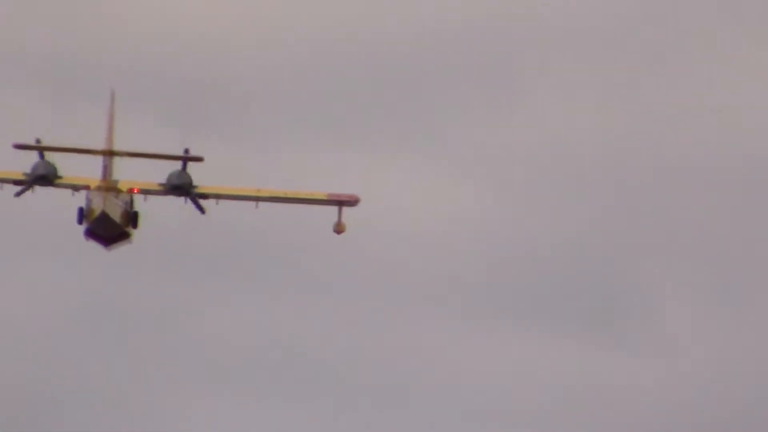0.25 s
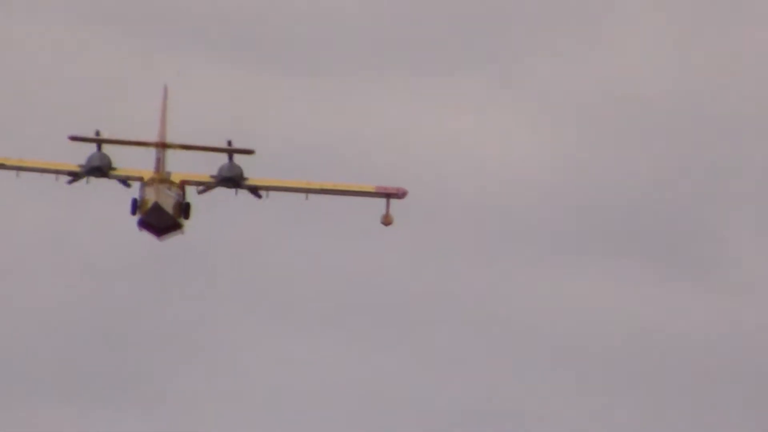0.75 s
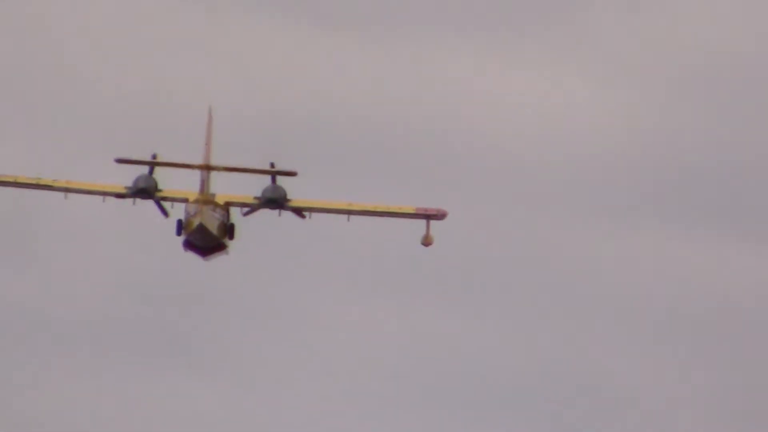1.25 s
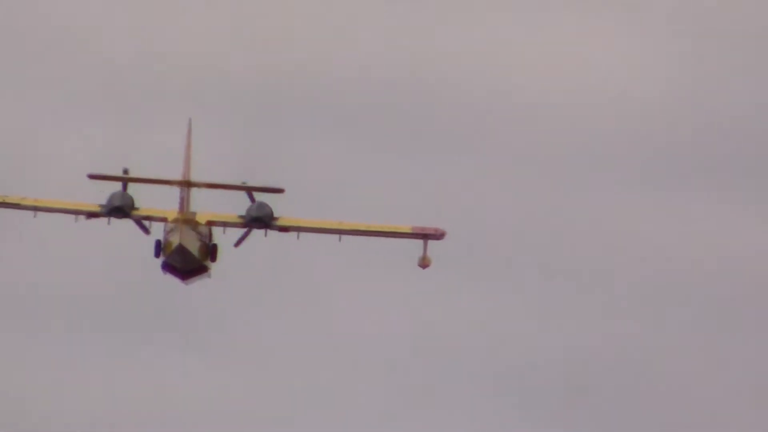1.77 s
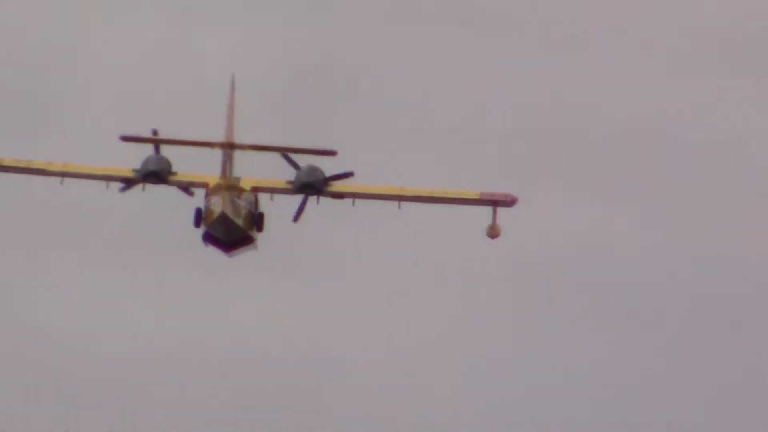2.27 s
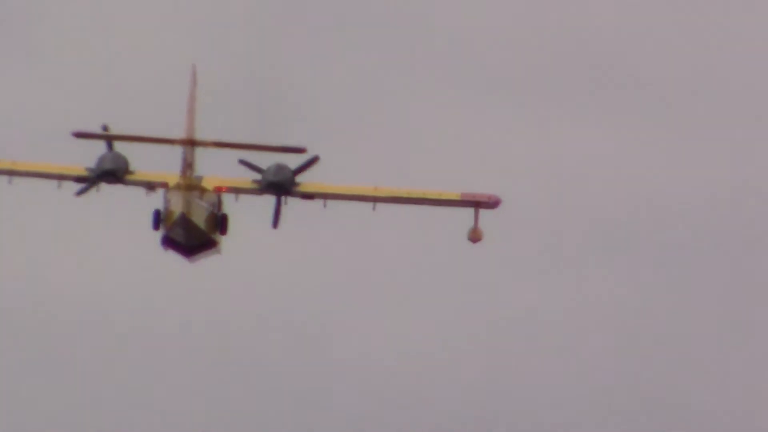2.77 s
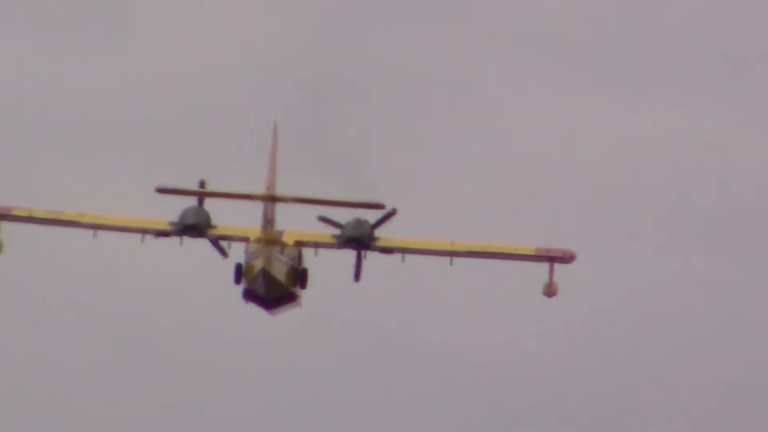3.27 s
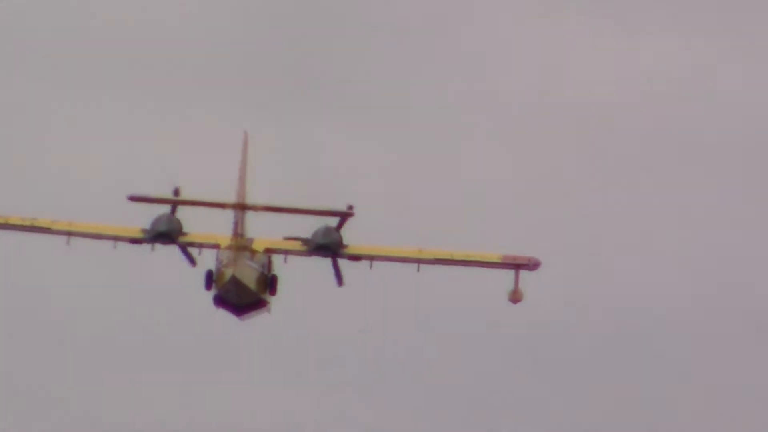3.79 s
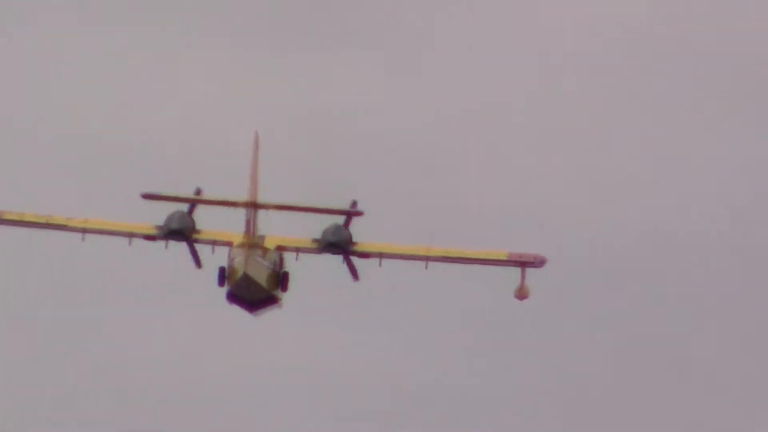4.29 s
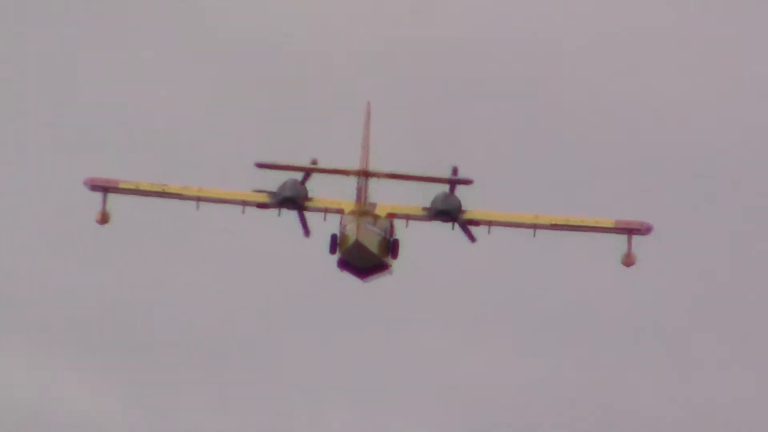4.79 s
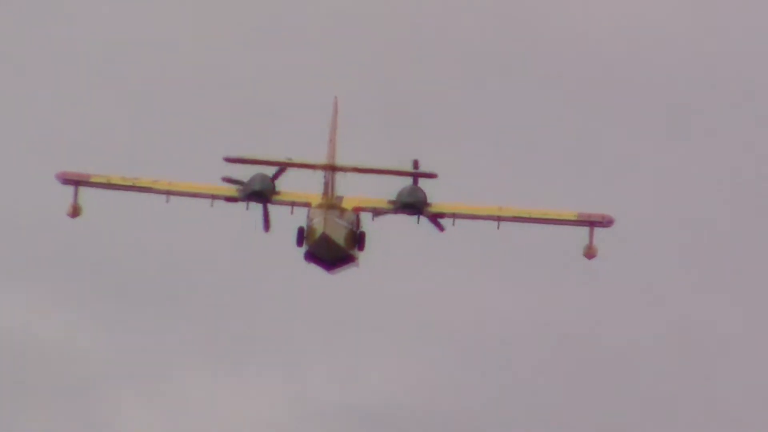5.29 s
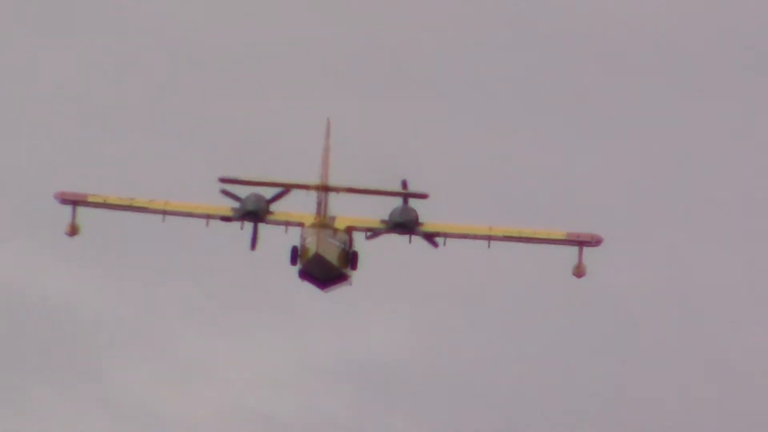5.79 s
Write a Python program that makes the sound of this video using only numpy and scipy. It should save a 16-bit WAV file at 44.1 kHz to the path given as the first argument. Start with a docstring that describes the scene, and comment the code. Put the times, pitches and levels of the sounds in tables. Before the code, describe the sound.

Outdoors, a twin-engine propeller aircraft drones steadily in the distance while loud low wind buffeting rumbles and moans across a handheld camera's stereo microphones. Small plastic clicks sound early. Around two seconds the wind falls to a lull, baring the drone; another click follows, then gusts and slaps return, leaning left and ending strong.

```python
"""From the start a twin-engine aircraft drones far overhead: sine waves at multiples of each engine's
cycle, over a broad roar of noise. Gusts of noise buffet the two microphone ports of a hand-held camera,
with low moans whose pitch glides up and down, a deep rumble and steady hiss. Soon its motor whines in
short bursts, then a cluster of case clicks rings damped modes. The wind drops to a lull after two
seconds, one more click follows, and later gusts and slaps build to a strong finish."""
import sys
import numpy as np
from scipy import signal
from scipy.fft import rfft, irfft
from scipy.io import wavfile
from scipy.ndimage import uniform_filter1d

SR = 44100
rng = np.random.default_rng(int(sys.argv[2]) if len(sys.argv) > 2 else 0)


def dump_mix(stems):
    """Bounce the given channels to the path in sys.argv[1] as a 16-bit WAV at rate SR."""
    frames = np.atleast_2d(stems).T  # one column per channel
    limited = np.clip(frames, -1, 1)  # hard clip at full scale
    pcm = np.round(limited * 32767).astype(np.int16)
    wavfile.write(sys.argv[1], SR, pcm)


N = 266800

# Engine cycles per second, one cycle being two crank turns: start_s, left_engine_hz, right_engine_hz
ENGINE_CYCLES = [(0, 16.74, 16.68), (3, 16.68, 16.64), (6.05, 16.7, 16.62)]
# Tones of both engines: multiple_of_cycle_rate, then peak_db at four even moments, before shimmer
ENGINE_TONES = [(18, -50.5, -50.5, -48, -47), (19, -52, -48, -45, -43), (22, -49, -47.5, -48, -46),
                (25, -55, -51, -44.5, -43), (27, -49, -48, -52, -46.5), (28, -48, -51.5, -41, -44.5),
                (29, -56.5, -54, -49, -44), (30, -40.5, -49.5, -46, -51), (31, -46, -41, -50, -47),
                (33, -45.5, -47, -58, -60), (36, -46.5, -50.5, -60, -60), (37, -49.5, -45.5, -52.5, -57)]

# Changes in the roar; only the change from each column's mean counts:
# start_s, low_hump_db, valley_db, high_hump_db, upper_edge_db
ROAR_CHANGES = [(.3, -0.5, -44, -48, -51.5), (.8, -2.5, -46, -40.5, -52.5), (1.23, 2.5, -47.5, -45, -52),
                (2.1, -4, -50.5, -46, -54.5), (2.45, -0.5, -45, -48, -54), (3.0, -4.5, -45, -48.5, -51.5),
                (3.55, -4.5, -38.5, -52.5, -53.5), (4.0, -4, -46, -48.5, -56),
                (4.6, -4, -46.5, -49.5, -53.5), (5.1, -3.5, -45.5, -44, -53), (5.73, -5, -46.5, -49.5, -55),
                (6.0, -4.5, -46.5, -50.5, -57)]
# Centres of the steady bass and of the four changing regions above it: pitch_hz
ROAR_CENTRES_HZ = (250, 597, 935, 1320, 1900)
# Relative spectrum of the roar: pitch_hz, level_db (per Hz)
ROAR_SPECTRUM = [(25, -35.5), (45, -18), (80, 0.5), (120, 3), (200, -9), (340, -21), (520, -3), (750, -7),
                 (1020, -14.5), (1380, -13.5), (1800, -20), (2300, -33.5), (3000, -41.5)]
ROAR_DB = -33

# Wind at the ports, before slaps and PORT_DB: start_s, level_db, left_minus_right_db
GUSTS = [(0, -17.5, 0), (.45, -16, 0.5), (1.08, -18.5, 2.5), (1.18, -21, 0.5), (1.4, -19, 3),
         (1.94, -23, 2.5), (2.02, -32, -1.5), (2.14, -33, -2), (2.36, -22, 6), (2.48, -22, 1),
         (2.56, -29.5, 3), (2.73, -34.5, -2), (3.03, -30, 3), (3.2, -34.5, 1), (3.3, -28, 3),
         (3.57, -21.5, 7), (4.28, -21.5, 3), (4.42, -27, 1.5), (4.74, -32, 1.5), (4.88, -19.5, 3.5),
         (5.4, -23, 3.5), (5.8, -27, 3.5), (5.93, -21, 8), (6.05, -16.5, 10.5)]
# Hardest slaps, added to the gusts: peak_s, rise_db, left_minus_right_db
WIND_SLAPS = [(1.123, 3.5, 0), (1.27, 3, 2), (1.37, 4.5, 0), (3.279, 2.5, -2), (3.84, 2.5, -4),
              (4.95, 5.5, 2), (5.219, 6, -4), (5.322, 4.5, 6.5), (5.48, 4.5, -3), (5.63, 3.5, -8)]
# Relative spectrum of the buffeting: pitch_hz, level_db (per Hz)
EDDY_SPECTRUM = [(25, -56), (50, -51), (90, -20), (130, -7), (180, -6.5), (245, -6), (380, -14),
                 (600, -33.5), (1200, -53.5), (1700, -66)]
# Hum of the commonest eddy size and its moan: start_s, pitch_hz, left_moan_db, right_moan_db
EDDY_HUM = [(0, 174.5, -42, -45), (.33, 219, -28, -25), (.45, 159.8, -32, -23), (.7, 165.3, -32, -25),
            (.82, 184.7, -30.5, -33), (.95, 192, -17.5, -19), (1.04, 184, -23.5, -14.5),
            (1.16, 195.1, -35, -31.5), (1.25, 194.7, -15.5, -24.5), (1.37, 185, -21, -16),
            (1.5, 170, -14, -18), (1.62, 155, -21.5, -33), (1.72, 185.2, -22, -15), (1.82, 150, -24, -36),
            (1.96, 121.8, -23, -33), (2.05, 130, -45, -54), (2.43, 140.3, -28, -38),
            (2.55, 141.7, -47, -49), (3.8, 194, -37, -38.5), (4.15, 160, -37, -29), (4.7, 139.4, -49, -52),
            (4.95, 202, -27, -28), (5.37, 148.3, -17, -30), (5.47, 149, -39.5, -33), (6.05, 186, -32, -36)]
SLAP_S = 0.044  # half the length of a slap
EDDY_EDGE_HZ, EDDY_WANDER_OCT = 180, 0.054
EDDY_SHARED, EDDY_LAG_S = 0.35, 0.00067  # share by power; it passes the left port first
PORT_DB = 2.5  # one port alone, over the average of the two, where unshared eddies partly cancel

# Deep rumble under the buffeting: start_s, level_db
RUMBLE_LEVELS = [(0, -51), (.5, -44), (.9, -62), (1.4, -54), (2.1, -62), (2.75, -49), (3.1, -40),
                 (3.5, -36), (4.1, -36), (4.6, -54), (5.1, -41), (5.7, -41), (6.05, -33)]
# Relative spectrum of the rumble: pitch_hz, level_db (per Hz)
RUMBLE_SPECTRUM = [(25, -24.5), (45, -14.5), (75, -3), (105, 3), (150, -20)]
RUMBLE_SHARED = 0.5  # share by power

# Relative spectrum of the hiss common to both ports: pitch_hz, level_db (per Hz)
HISS_SPECTRUM = [(1500, 5.5), (2500, 0), (4000, -4), (6000, -6), (9000, -11), (13000, -16), (16000, -20)]
# Relative spectrum of the hiss opposite at the two ports: pitch_hz, level_db (per Hz)
HISS_SIDE_SPECTRUM = [(1200, -9.5), (2000, -6), (2600, -6), (4000, -13), (9000, -22), (13000, -24),
                      (16000, -30)]
HISS_DB, HISS_SIDE_DB = -58, -8  # the side level is relative to HISS_DB

# Bursts of the camera motor, before flutter: start_s, length_s, level_db
MOTOR_BURSTS = [(.12, .05, -68.5), (.38, 0.037, -66), (.455, 0.06, -69), (0.619, 0.042, -68),
                (1.28, 0.26, -71.5), (1.56, .55, -74.5), (2.11, 0.6, -75.5), (2.764, 0.2, -69.5),
                (3.405, 0.043, -70), (3.819, 0.12, -76), (4.01, 0.076, -72), (4.154, .054, -73),
                (4.5, .07, -74), (4.655, 0.22, -74), (4.959, 0.091, -73), (5.549, 0.063, -74),
                (5.784, 0.085, -73)]
WHINE_HZ = 5561
WHINE_IDLE_DB, IDLE_WAVER_DB = -82, 3  # murmur between bursts

# Case clicks: start_s, peak_db, brightness_db_per_octave, contact_s, extra_knock_db, extra_ping_db
CASE_CLICKS = [(.2183, -42, 7, .004, -8, -6), (.2264, -23, 0, .005, 2, 0), (.2280, -20, -1, .004, 3, -3),
               (.2300, -33, 0, .005, -6, 9), (.3272, -38, 2, .003, -6, -10), (.3310, -40, 3, .003, -6, -10),
               (2.7181, -29, 3, .005, -9, -7)]
# Ringing modes of the case: pitch_hz, level_db, fall_by_60_db_s, left_minus_right_db
CASE_MODES = [(1400, 0, .009, 0), (1770, -1, .008, 0), (2200, -1, .010, -6), (2450, -9, .008, -10),
              (2680, -11, .008, 3), (4000, -11, .007, 0), (5000, -16, .005, 0), (6200, -16, .005, 0),
              (7400, -17, .005, 0), (9800, -25, .003, 0), (12300, -28, .003, 0)]
KNOCK_BELOW_HZ, PING_HZ = 2000, 4000

CEILING, TOP_HZ = 0.99, 15720  # of the input stage


def undb(db):
    """Turns decibels into a plain multiplier."""
    return 10 ** (np.asarray(db) / 20)


def level(x, db):
    """Sets the average (RMS) level of a sound."""
    return x * undb(db) / np.sqrt(np.mean(x ** 2))


def curves(table):
    """Draws straight lines between the rows, giving each column at every sample."""
    s, *columns = np.transpose(table)
    return [np.interp(np.arange(N) / SR, s, column) for column in columns]


def colour_db(table, hz):
    """Reads a spectrum table, straight between rows on a log-frequency axis."""
    table_hz, db = np.transpose(table)
    return np.interp(np.log(hz), np.log(table_hz), db)


def walk(rate):
    """Wanders smoothly between random values, `rate` of them a second, with a spread near 1."""
    hold = int(SR / rate)
    steps = np.repeat(rng.standard_normal(N // hold + 1), hold)
    smooth = uniform_filter1d(uniform_filter1d(steps, hold), hold)
    return 1.3 * smooth[:N]


def bands(x, table, per_octave):
    """Colours a sound and splits it into overlapping bands that add up again: centre_hz, sound."""
    lowest_hz, highest_hz = table[0][0], table[-1][0]
    hz = np.maximum(np.fft.rfftfreq(N, 1 / SR), 1)
    spectrum = rfft(x) * undb(colour_db(table, hz)) * (hz >= lowest_hz)
    place = np.log2(hz / lowest_hz) * per_octave
    for k in range(int(np.log2(highest_hz / lowest_hz) * per_octave) + 1):
        overlap = np.clip(1 - abs(place - k), 0, 1)
        yield lowest_hz * 2 ** (k / per_octave), irfft(spectrum * overlap, N)


def engines():
    """Repeating cycles make tones at whole multiples; turbulent air shakes their level and phase."""
    drone, along = 0, np.arange(N) / N
    for cycle_hz in curves(ENGINE_CYCLES):
        turns = np.cumsum(cycle_hz) / SR + 0.014 * walk(6)
        for multiple, *drift_db in ENGINE_TONES:
            db = np.interp(along, np.linspace(0, 1, len(drift_db)), drift_db)
            db = db + 3.37 * walk(2.967) + 2.5 * walk(10)
            drone = drone + undb(db) * np.sin(2 * np.pi * (multiple * turns + rng.random()))
    return drone


def roar():
    """Exhaust and slipstream noise throbs a little with the firings; its bands swell and flicker."""
    changes_db = [0] + [db - db.mean() for db in curves(ROAR_CHANGES)]  # 0 keeps the bass steady
    turns = np.cumsum(curves(ENGINE_CYCLES)[0]) / SR
    throb = 1 + 0.13 * np.sin(2 * np.pi * 3 * turns)
    gas = rng.standard_normal(N) * throb * undb(0.83 * walk(150))
    total = 0
    for hz, band in bands(gas, ROAR_SPECTRUM, per_octave=3):
        place = np.interp(np.log(hz), np.log(ROAR_CENTRES_HZ), np.arange(len(changes_db)))
        # a band between two centres blends their changes
        swell_db = sum(max(1 - abs(place - k), 0) * db for k, db in enumerate(changes_db))
        total = total + band * undb(swell_db + 1.22 * walk(9))
    return level(total, ROAR_DB)


def buffet(thumps, db, eddy_hz):
    """Eddies thump one port unevenly; the commonest size hums and stronger gusts add edge."""
    total = power = 0
    for hz, band in bands(thumps, EDDY_SPECTRUM, per_octave=4):
        hum_db = 7 * np.exp(-(np.log2(hz / eddy_hz) / 0.2) ** 2)
        octaves_up = np.clip(np.log2(hz / EDDY_EDGE_HZ), -1.2, 1.2)
        edge_db = 0.24 * octaves_up * (db + 17)  # brighter above -17 dB, duller below
        gain = undb(hum_db + edge_db)
        total = total + band * gain * undb(0.68 * walk(8.9))
        power = power + np.mean(band ** 2) * gain ** 2
    # take out the loudness of the colouring, so that the gusts set the level
    return level(total / np.sqrt(power), 0) * undb(db)


def wind():
    """Moving air strikes two ports, which share the gusts and some of the eddies."""
    db, lean_db = curves(GUSTS)
    t = np.arange(N) / SR
    for peak_s, rise_db, slap_lean_db in WIND_SLAPS:
        slap = np.clip(1 - abs(t - peak_s) / SLAP_S, 0, 1)
        db = db + rise_db * slap
        lean_db = lean_db + slap_lean_db * slap
    eddy_hz = curves(EDDY_HUM)[0] * 2 ** (EDDY_WANDER_OCT * walk(7.3))

    def uneven_noise():
        """Eddies arrive in irregular clumps."""
        return rng.standard_normal(N) * undb(2.52 * walk(70) + 1.22 * walk(18))

    both, ports = uneven_noise(), []
    for side in (1, -1):  # left, right
        shared = np.roll(both, int(-side * EDDY_LAG_S * SR / 2))
        thumps = np.sqrt(EDDY_SHARED) * shared + np.sqrt(1 - EDDY_SHARED) * uneven_noise()
        ports.append(buffet(thumps, db + side * lean_db / 2, eddy_hz))
    return undb(PORT_DB) * np.array(ports)


def moan():
    """Eddies shed in step moan at a gliding, wavering pitch, in opposite phase at the two ports."""
    hz, left_db, right_db = curves(EDDY_HUM)
    phase = 2 * np.pi * np.cumsum(hz * (1 + 0.015 * walk(13))) / SR
    tone = np.sqrt(2) * undb(1.5 * walk(20)) * np.sin(phase)
    return tone * np.array([undb(left_db), -undb(right_db)])


def deep_rumble():
    """Large slow eddies rumble, partly at both ports together."""
    def rumble():
        """Low bands of noise swell separately."""
        noise = rng.standard_normal(N)
        split = bands(noise, RUMBLE_SPECTRUM, per_octave=1.8)
        return level(sum(band * undb(3.1 * walk(5.2)) for _, band in split), 0)

    both, own = rumble(), np.array([rumble(), rumble()])
    mix = np.sqrt(RUMBLE_SHARED) * both + np.sqrt(1 - RUMBLE_SHARED) * own
    return mix * undb(curves(RUMBLE_LEVELS)[0])


def hiss():
    """Steady hiss, mostly alike at both ports and gently wavering, with a weaker part opposite at them."""
    def coloured(spectrum):
        """White noise takes on the given spectrum."""
        split = bands(rng.standard_normal(N), spectrum, per_octave=1)
        return level(sum(band for _, band in split), HISS_DB)

    middle = coloured(HISS_SPECTRUM) * undb(0.45 * walk(9.2))
    side = coloured(HISS_SIDE_SPECTRUM) * undb(HISS_SIDE_DB)
    return middle + side * np.array([[1], [-1]])


def motor_whine():
    """The camera motor sings one thin, unsteady tone in bursts, with a murmur between them."""
    t = np.arange(N) / SR
    bursts = sum(undb(db) * ((t >= on) & (t < on + length)) for on, length, db in MOTOR_BURSTS)
    bursts = uniform_filter1d(bursts, size=SR // 200)  # soft edges, 5 ms
    running = np.maximum(bursts, undb(WHINE_IDLE_DB + IDLE_WAVER_DB * walk(6.4)))
    tone = np.sin(2 * np.pi * WHINE_HZ * t + 0.8 * walk(25))
    return np.sqrt(2) * running * undb(2.1 * walk(50)) * tone


def clicks():
    """A snap and a short scrape ring damped case modes, some leaning to one port."""
    out, ring = np.zeros((2, N)), np.arange(SR // 40) / SR
    for start_s, db, tilt_db, contact_s, knock_db, ping_db in CASE_CLICKS:
        noise = rng.standard_normal((2, len(ring)))
        scrape = 0.07 * np.sin(np.pi * np.minimum(ring / contact_s, 1)) ** 2 * noise
        snap = np.arange(len(ring)) == int(contact_s * SR / 3)
        body = np.zeros((2, len(ring)))
        for hz, mode_db, t60, lean_db in CASE_MODES:
            mode_db = mode_db + tilt_db * np.log2(hz / KNOCK_BELOW_HZ)
            mode_db += knock_db * (hz < KNOCK_BELOW_HZ) + ping_db * (hz == PING_HZ)
            port_gain = undb(mode_db + np.array([[1], [-1]]) * lean_db / 2)
            body += port_gain * np.sin(2 * np.pi * hz * ring) * 1000 ** (-ring / t60)
        body *= 1 - np.exp(-ring / 0.0006)  # plastic gives a little, so the edge is soft
        click = np.array([np.convolve(*port)[:len(ring)] for port in zip(snap + scrape, body)])
        first = int(start_s * SR)
        # the peak is set on the average of both ports
        out[:, first:first + len(ring)] += undb(db) * click / abs(click.mean(axis=0)).max()
    return out


def scene():
    """The far aircraft reaches both ports alike; wind and camera sounds join it."""
    aircraft = engines() + roar()
    air = wind() + moan() + deep_rumble()
    camera = hiss() + motor_whine() + clicks()
    return aircraft + air + camera


def record(dry):
    """The input stage rounds the strongest peaks; a steep filter cuts the top."""
    rounded = dry / (1 + (dry / CEILING) ** 4) ** (1 / 4)
    top_cut = signal.ellip(10, 0.2, 80, TOP_HZ, fs=SR, output="sos")
    return signal.sosfilt(top_cut, rounded)


dry = scene()
out = record(dry)
dump_mix(out)
```